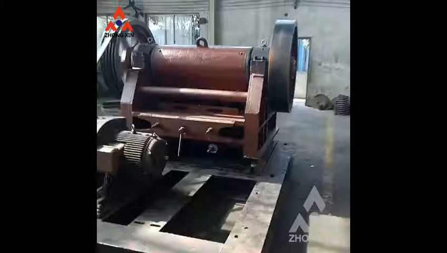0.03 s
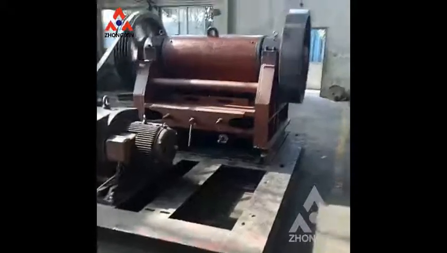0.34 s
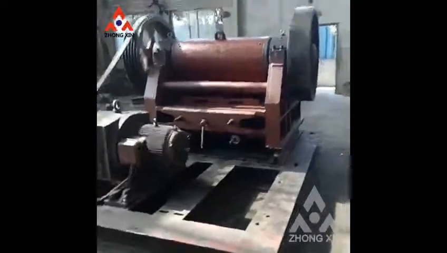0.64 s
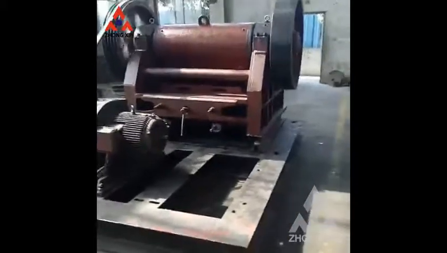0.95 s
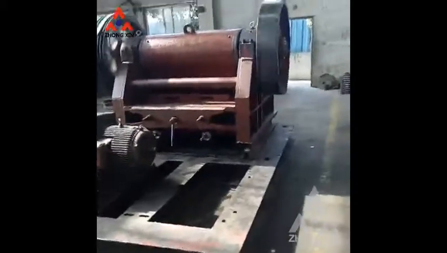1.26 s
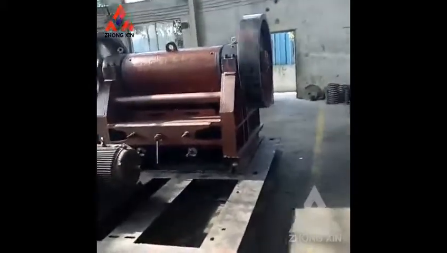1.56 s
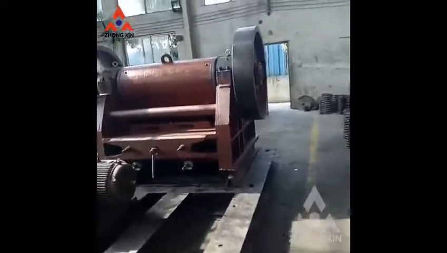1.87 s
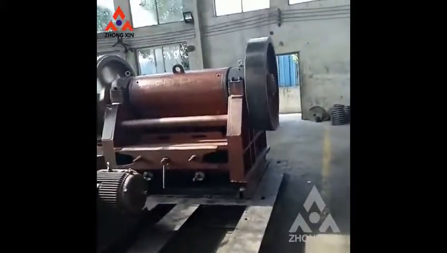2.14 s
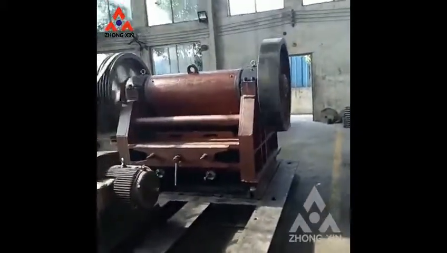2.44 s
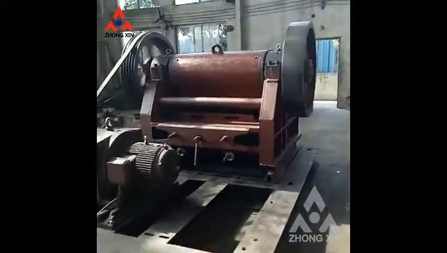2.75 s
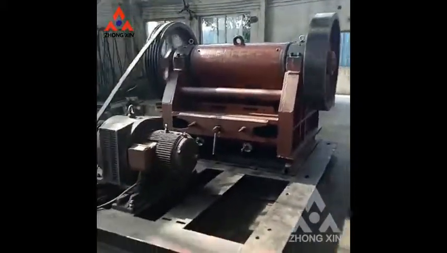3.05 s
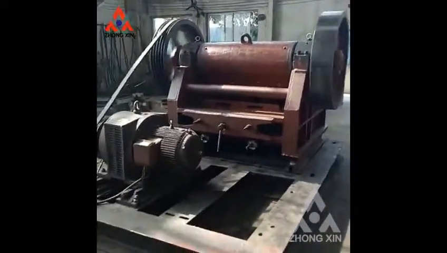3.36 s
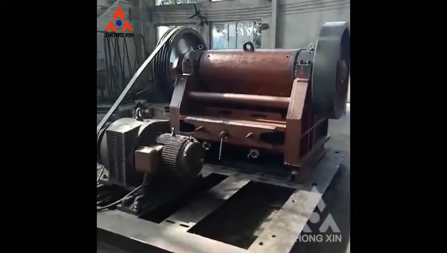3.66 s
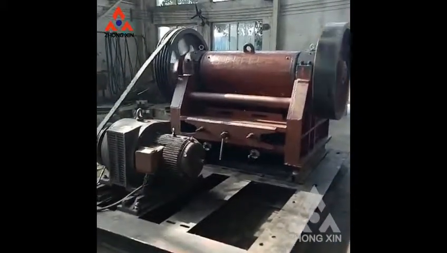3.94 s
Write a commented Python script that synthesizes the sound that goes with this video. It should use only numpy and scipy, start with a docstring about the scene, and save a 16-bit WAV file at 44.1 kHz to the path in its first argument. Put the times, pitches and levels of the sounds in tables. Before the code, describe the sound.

A belt-driven crushing machine fades in and runs loudly a few metres away, a little to the left. Its low rumble and wavering hum carry quick metal knocks and rattling, blurred into a roar by the workshop's echo.

```python
"""A belt-driven jaw crusher runs empty in a workshop, a few metres away.
Its loose steel rattles in time with the swinging jaw, knocks about six times a second and sets the
jaw and flywheel ringing. Behind that, bearings and belts rumble, and the drive hums and makes the
frame boom. The hall's echo blurs it all into a roar, which fades in at the start."""
import sys
import numpy as np
from scipy import signal
from scipy.fft import rfft, irfft
from scipy.io import wavfile
from scipy.ndimage import uniform_filter1d

SR = 44100
rng = np.random.default_rng(int(sys.argv[2]) if len(sys.argv) > 2 else 0)


def wrap_up_sound(samples):
    """Save the sound to the file named by the first command line argument, as 16-bit audio."""
    columns = np.atleast_2d(samples).T
    # keep every value between -1 and 1, then stretch to whole-number steps
    tamed = np.clip(columns, -1, 1)
    steps = np.round(tamed * 32767).astype(np.int16)
    wavfile.write(sys.argv[1], SR, steps)


N = 176400  # 4 seconds


def undb(db):
    """Turn decibels into a volume multiplier."""
    return 10 ** (np.asarray(db) / 20)

def level(x, db):
    """Set a sound's average (rms) level."""
    return x * undb(db) / np.sqrt(np.mean(x ** 2))

def over_time(t, points):
    """Join (time, value) points with straight lines."""
    return np.interp(t, *np.array(points).T)

def over_pitch(points):
    """Join (frequency, value) points into a curve over the whole spectrum."""
    hz, value = np.array(points, float).T
    return np.interp(np.log(np.arange(N // 2 + 1) * SR / N + 1e-9), np.log(hz), value)

def colour(x, points):
    """Turn frequencies up or down by (frequency [Hz], gain [dB]) points."""
    return irfft(rfft(x) * undb(over_pitch(points)), N)

def wander(per_s):
    """A smooth random wobble, about 1 either side of zero."""
    step = int(SR / per_s)
    held = rng.standard_normal(N)[np.arange(N) // step]
    return 1.3 * uniform_filter1d(uniform_filter1d(held, step), step)

def ring(x, hz, t60):
    """A struck part rings at one pitch, dying away by 60 dB in t60 seconds."""
    pole = np.exp((2j * np.pi * hz - np.log(1000) / t60) / SR)
    return signal.lfilter([1], [1, -pole], x).imag

def impacts(per_s, spread_db):
    """Tiny hits at random moments, a few much harder than the rest."""
    hits = (rng.random(N) < per_s / SR) * rng.choice([-1, 1], N)
    return hits * undb(spread_db * np.minimum(rng.exponential(size=N), 5))

def short_rings(per_s, low_hz, high_hz, t60, spread_db):
    """Brief rings at random moments and pitches."""
    age = np.arange(int(t60 * SR)) / SR
    shape = np.exp(-np.log(1000) * age / t60) * (1 - np.exp(-age * low_hz))
    out = np.zeros(N + len(age))
    for when, pitch, softness in rng.random((int(per_s * N / SR), 3)):
        hz = low_hz + pitch * (high_hz - low_hz)
        at = int(when * N)
        gain = undb(-spread_db * np.log(softness + 0.04))
        out[at:at + len(age)] += gain * shape * np.sin(2 * np.pi * hz * age)
    return out[:N]

def hall(x, echo_db, t60=0.67):
    """Sound arrives directly, then echoes off the walls; gives two unrelated versions of it."""
    t = np.arange(SR) / SR
    echo = rng.standard_normal((2, SR)) * undb(-60 * t / t60)
    direct = rng.standard_normal((2, SR)) * np.exp(-t / 0.0016)
    unit = lambda h: h / np.sqrt(np.sum(h ** 2, axis=1, keepdims=True))
    room = rfft(unit(direct) + undb(echo_db) * unit(echo), N)
    room /= np.sqrt(uniform_filter1d(abs(room) ** 2, size=12, axis=1))  # keep the tone even
    return irfft(rfft(x) * room, N)


# Faint ticks (time [s], level [dB])
TICK_TIMES = [(0.133, -47), (0.282, -40)]

def ticks(t, decay_s=0.0004):
    """Tiny dry ticks, heard while the roar is still quiet."""
    shape = sum(undb(db) * (t >= at) * np.exp(-abs(t - at) / decay_s) for at, db in TICK_TIMES)
    return colour(shape * rng.standard_normal(N), [(2000, -12), (6000, 0), (8500, 2), (12000, -16)])

# Tone of the rumble (frequency [Hz], gain [dB])
RUMBLE_TONE = [(12, -18), (22, -16.5), (38, -21.5), (60, -16), (76, -2.5), (105, -6.5), (135, 1), (180, -1),
               (215, -2), (275, 2), (330, -1.5), (400, 1), (465, -2), (540, -1), (610, -3.3), (660, -9.5),
               (900, -19), (2000, -50)]

def rumble():
    """Bearings and belts send many soft blows into the heavy frame; frame and guards ring hollowly."""
    blows = hall(impacts(per_s=900, spread_db=2.5), echo_db=-3)
    hollow = short_rings(per_s=36, low_hz=340.6, high_hz=570, t60=0.2, spread_db=1.5)
    return level(colour(blows, RUMBLE_TONE), -20.5) + level(hall(hollow, echo_db=-8), -31.5)

def tone(t, hz, bend_rad):
    """A pure note with an rms level of 1; a changing bend makes its pitch waver."""
    return np.sqrt(2) * np.sin(2 * np.pi * (hz * t + rng.random()) + bend_rad)

# How the drone swells and dips (time [s], level [dB])
DRONE_SWELLS = [(0.28, -33), (0.5, -33), (0.53, -21), (0.56, -41), (0.6, -21), (0.77, -33.5), (0.95, -22.5),
                (1.01, -36), (1.35, -19), (1.54, -29.5), (1.66, -20.5), (1.83, -33), (1.89, -19),
                (1.96, -31.5), (2.23, -32.5), (2.26, -27), (2.29, -32), (2.47, -23.5), (2.51, -38),
                (2.64, -23), (2.68, -25.5), (2.86, -18.5), (2.91, -28), (2.94, -20), (3.08, -26),
                (3.11, -39), (3.24, -20.5), (3.36, -26.5), (3.69, -18), (3.76, -28), (3.8, -18),
                (3.91, -25.5), (3.97, -17.5), (4.0, -21)]

def drive_drone(t):
    """The drive's low, wavering note."""
    drone = tone(t, hz=145.5, bend_rad=0.6 * wander(per_s=12))
    return undb(over_time(t, DRONE_SWELLS) - 1.5) * drone

def frame_boom(hz=138.4, width_hz=18):
    """The drive shakes the frame, which booms close to the drone's pitch."""
    boom = ring(rng.standard_normal(N), hz, t60=np.log(1000) / np.pi / width_hz)
    return level(colour(boom, [(60, -21.5), (120, -2.5), (165, -6.5), (330, -18.5)]), -33.5)

# How the hum swells and dips (time [s], level [dB])
HUM_SWELLS = [(0.28, -25.5), (0.37, -31), (0.42, -19), (0.49, -20.5), (0.53, -35), (0.57, -26.5),
              (0.62, -20.5), (0.67, -37), (0.77, -20), (0.85, -23.5), (0.88, -34), (0.94, -23),
              (1.48, -28.5), (1.54, -20.5), (1.63, -27.5), (1.66, -21.5), (1.82, -27), (1.89, -23),
              (1.95, -32), (2.0, -24.5), (2.06, -27), (2.3, -22), (2.33, -34.5), (2.4, -30), (2.43, -24),
              (2.65, -23.5), (2.73, -29.5), (2.8, -23), (2.86, -33), (2.89, -26), (2.92, -35),
              (2.95, -24.5), (3.16, -31.5), (3.18, -25.5), (3.27, -23.5), (3.33, -31.5), (3.36, -21),
              (3.73, -30), (3.76, -18), (3.79, -35), (3.82, -24.5), (4.0, -20.5)]

def drive_hum(t, swings, lag_swings=0.65):
    """The drive hums an octave above its drone, throbbing and swaying with each swing of the jaw."""
    jaw = 2 * np.pi * (swings - lag_swings)
    bend = 0.8 * np.sin(jaw) + 0.87 * wander(per_s=12) + 0.35 * wander(per_s=55)  # sway, waver, rasp
    throb = 1 + 0.25 * np.cos(jaw)
    return undb(over_time(t, HUM_SWELLS) - 1) * throb * tone(t, hz=290.8, bend_rad=bend)

def ping(t, at_s=2.394, hz=5200, t60=0.028):
    """One small, bright steel hit on a hard knock; its ring starts a little sharp and settles."""
    sag_hz, sag_s, attack_s = 450, 0.003, 0.003
    age = np.maximum(t - at_s, 0)
    cycles = hz * age + sag_hz * sag_s * (1 - np.exp(-age / sag_s))
    shape = (1 - np.exp(-age / attack_s)) * np.exp(-np.log(1000) * age / t60)
    return undb(-23) * shape * np.sin(2 * np.pi * cycles)

# How the rattle pulses with the jaw (rate [pulses per swing], depth [dB])
RATTLE_PULSES = [(1, 1), (2, -0.45), (4, 0.6)]
# Its slow rise and fall (time [s], gain [dB])
RATTLE_SWELLS = [(0.4, -0.5), (0.78, -0.9), (0.95, 0.5), (1.2, 0.5), (1.55, 0.1), (1.68, -1.5), (2.0, -1.7),
                 (2.12, 0.3), (2.6, 1), (3.3, 0.7), (3.7, -0.8), (4, 0.2)]

def rattle(t, swings):
    """Loose steel makes thousands of tiny hits, harder and softer in time with the jaw."""
    pulse_db = sum(db * np.cos(2 * np.pi * rate * swings) for rate, db in RATTLE_PULSES)
    slow_db = over_time(t, RATTLE_SWELLS) + 0.83 * wander(per_s=14)
    hits = impacts(per_s=2200, spread_db=2.5) * undb(pulse_db + slow_db)
    return level(hall(hits, echo_db=0.5), -24.5)

# Each knock's mix (time [s], dull clank [dB], clatter [dB], bright edge [dB])
JAW_KNOCKS = [(0.379, -13.5, -1.5, -9), (0.468, -17.5, -4, -14), (0.542, -4.5, -1.5, -3.5),
              (0.700, -6.5, 2, -0.5), (0.868, 0, -2.5, -2), (1.029, 1.5, -4, 0), (1.106, -7.5, -6, -1),
              (1.138, -5.5, -12, -17.5), (1.272, -11.5, -6, -13.5), (1.433, 4, -0.5, 1.5),
              (1.713, -2, -2.5, -11.5), (1.771, -2.5, -2, -3.5), (1.915, -0.5, -2, -4),
              (2.069, -0.5, -5, -3.5), (2.151, -8, -7.5, -4.5), (2.231, -2.5, -5.5, -6.5),
              (2.314, -8, -4, -2), (2.391, -2, -4, 3), (2.721, -5, -12, -9), (2.873, 0.5, -3, -6),
              (2.952, -1.5, -5, -12.5), (3.04, -1.5, -7, -2), (3.235, -15, -14, -3), (3.395, 0, -12, -4.5),
              (3.555, -15.5, -5, -7), (3.606, -4.5, -9, -8), (3.803, 0, 1, -2), (3.891, -4.5, -4, -5),
              (3.956, -3.5, -4.5, -7)]
# Pitch ranges of clank, clatter and edge (lowest [Hz], highest [Hz])
KNOCK_RANGES = [(600, 1600), (1600, 3000), (3000, 6000)]

def knocks(t, attack_s=0.007, decay_s=0.017):
    """Each knock of the jaw is a ragged bunch of hits with its own share of clank, clatter and edge."""
    forces = np.zeros((len(KNOCK_RANGES), N))
    for at, *mix_db in JAW_KNOCKS:
        age = np.maximum(t - at, 0)
        shape = (1 - np.exp(-age / attack_s)) * np.exp(-age / decay_s)
        forces += np.outer(undb(mix_db), shape)
    out = np.zeros(N)
    for force, range_hz in zip(forces, KNOCK_RANGES):
        grit = rng.standard_normal(N) * undb(2 * wander(per_s=160))
        band = signal.butter(2, range_hz, "band", fs=SR, output="sos")
        out += signal.sosfilt(band, force * grit)
    return level(hall(out, echo_db=-6), -36.3)

# Tone of the loose steel (frequency [Hz], gain [dB])
STEEL_TONE = [(150, -9.5), (450, -8), (760, -6), (880, 0), (1000, -0.5), (1300, 1), (1430, -1),
              (1590, -6.5), (1690, -5), (1810, -11), (1950, -5.5), (2200, -4), (2320, -7), (2480, -4.5),
              (2780, -7.5), (3050, -6), (3300, -8.5), (3900, -11.5), (4400, -14.5), (4900, -19),
              (5800, -23.5), (7000, -33.5), (8000, -64)]
# Notes of the jaw and flywheel (pitch [Hz], relative level [dB], time to die away [s])
STEEL_NOTES = [(760, -15, 0.11), (927, 3.5, 0.63), (1127, -6.5, 0.45), (1957, -1, 0.071), (2225, -9, 0.11),
               (3140, -7.5, 0.087), (3510, -7.5, 0.13)]

def crusher_steel(blows):
    """Blows make steel plates clatter and the jaw and flywheel ring; small loose parts clink at random."""
    plates = level(colour(blows, STEEL_TONE), 0) * blows.std()  # as strong as the blows
    notes = sum(level(ring(blows, hz, t60), db) for hz, db, t60 in STEEL_NOTES)
    ringing = level(colour(notes, [(3600, -0.5), (7000, -18.5)]), -38)
    clinks = short_rings(per_s=340, low_hz=998, high_hz=4400, t60=0.045, spread_db=3)
    clinks = colour(hall(clinks, echo_db=-4.5), STEEL_TONE)
    return plates + ringing + level(clinks, -31.5)

# How alike the two ears hear the rumble and steel (frequency [Hz], likeness [0 to 1])
EAR_LIKENESS = [(60, 0.97), (130, 0.94), (250, 0.99), (460, 0.6), (900, 0.41), (1800, 0.17), (3500, 0.03)]
# How much louder the left is than the right (frequency [Hz], difference [dB])
LEFT_BOOST = [(60, 5), (290, 6.5), (420, 7), (600, 11.5), (850, 0.5), (1100, 4.5), (1500, 8), (2500, 8),
              (3100, 8.5), (3800, 4), (4600, -1), (7000, 8)]

def scene():
    """The crusher stands to the left; its low notes are alike in both ears, its highs spread wide."""
    swings_per_s, turnaround_s = 5.8, 0.1523
    t = np.arange(N) / SR
    swings = swings_per_s * (t - turnaround_s)  # counts the jaw's swings
    middle, side = rfft(rumble() + crusher_steel(rattle(t, swings) + knocks(t)))
    shared = rfft(drive_drone(t) + frame_boom() + drive_hum(t, swings) + ping(t))
    alike = np.clip(over_pitch(EAR_LIKENESS), 0, 0.999)
    left_right = np.array([[1], [-1]])
    ears = middle * np.sqrt((1 + alike) / 2) + left_right * side * np.sqrt((1 - alike) / 2) + shared
    gains = undb(left_right * over_pitch(LEFT_BOOST) / 2)
    gains /= np.sqrt(np.mean(gains ** 2, axis=0))  # lean left without getting louder
    return irfft(ears * gains, N)

def record(dry):
    """Round off the peaks, cut the highs, fade in from silence and add faint hiss and ticks."""
    fade_start_s, fade_s, peak_limit = 0.12, 0.27, 0.83
    cut_above = lambda x, hz: signal.sosfilt(signal.ellip(8, 0.2, 70, hz, fs=SR, output="sos"), x)
    t = np.arange(N) / SR
    fade = (t > fade_start_s) * np.clip(0.039 + (t - fade_start_s) / fade_s, 0, 1) ** 0.98
    hiss = level(rng.standard_normal(N) + 0.38 * rng.standard_normal((2, N)), -70.5)
    rounded = peak_limit * np.tanh(dry / peak_limit)
    roar = cut_above(fade * rounded, hz=7350)
    return cut_above(roar + fade * hiss + ticks(t), hz=15350)


dry = scene()
out = record(dry)
wrap_up_sound(out)
```